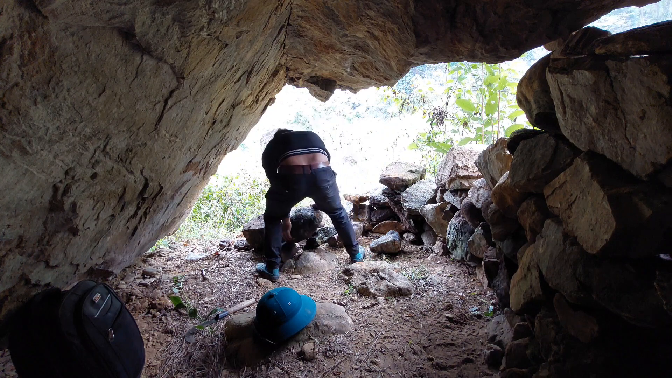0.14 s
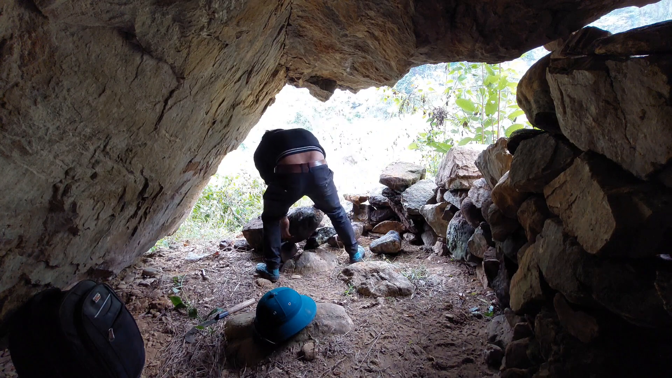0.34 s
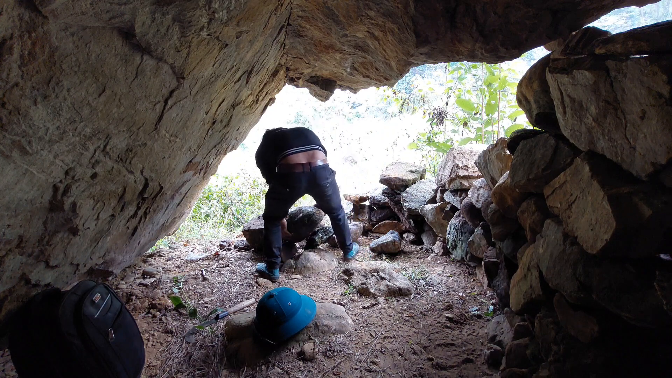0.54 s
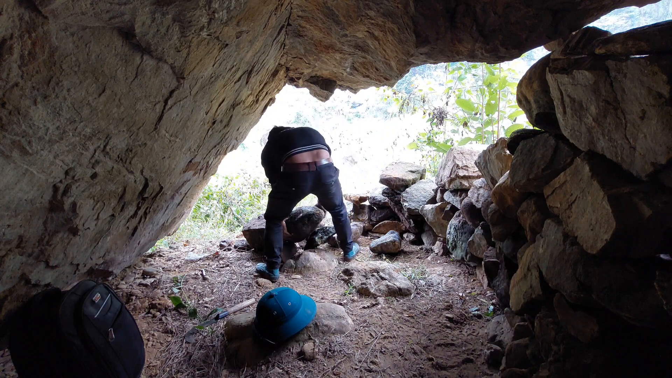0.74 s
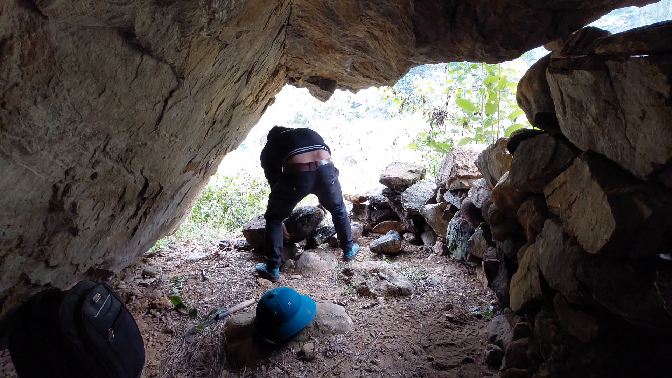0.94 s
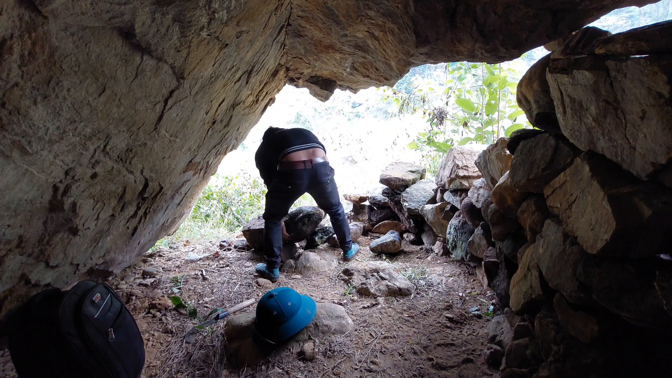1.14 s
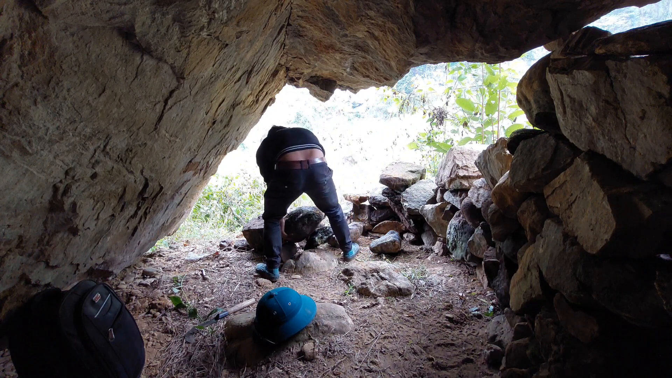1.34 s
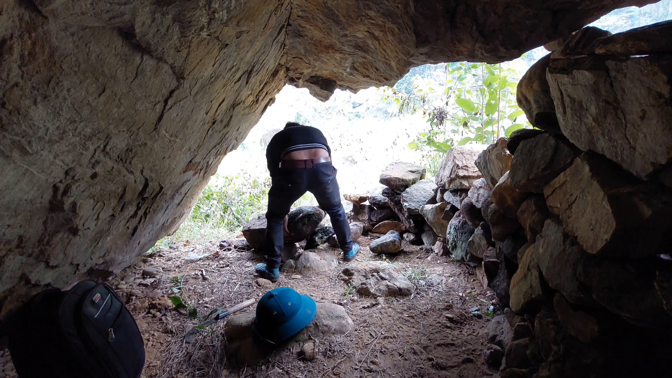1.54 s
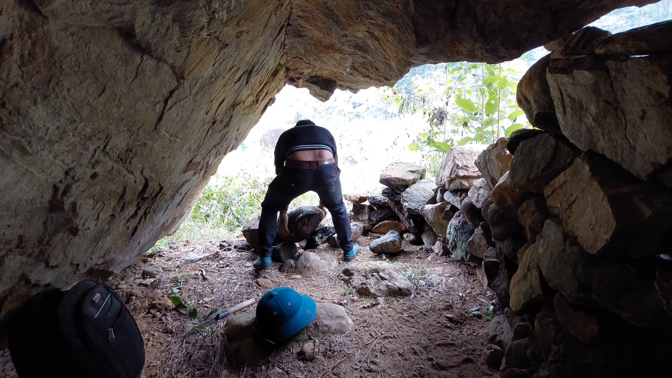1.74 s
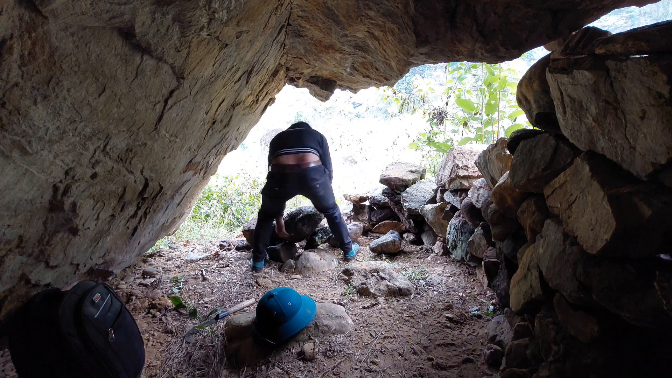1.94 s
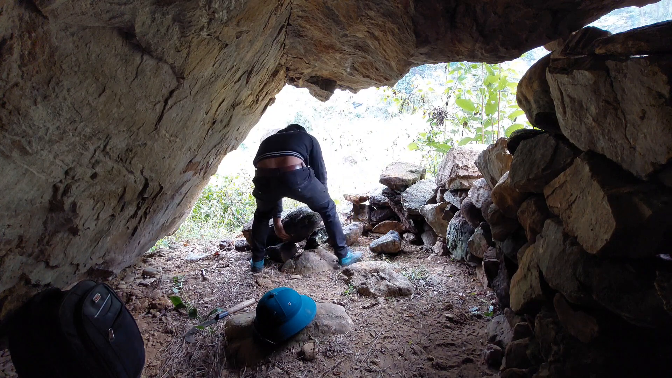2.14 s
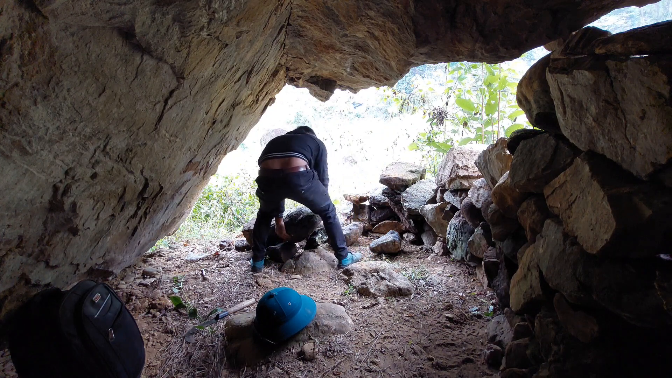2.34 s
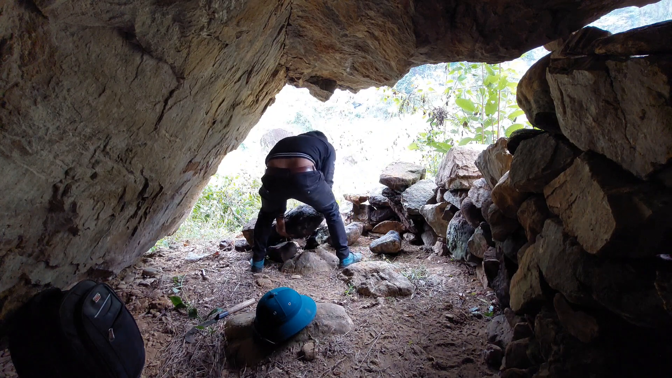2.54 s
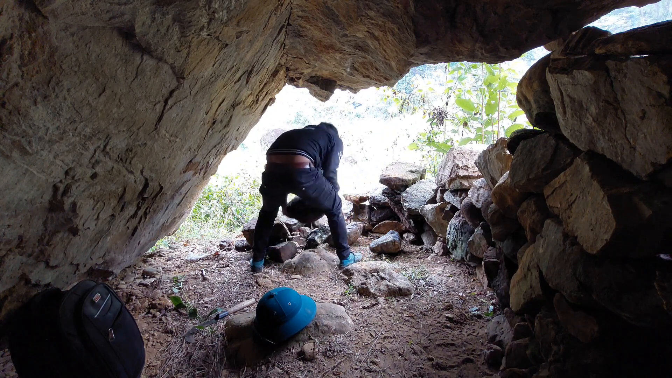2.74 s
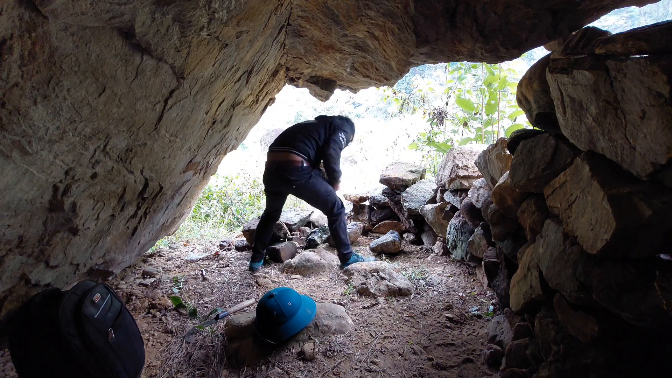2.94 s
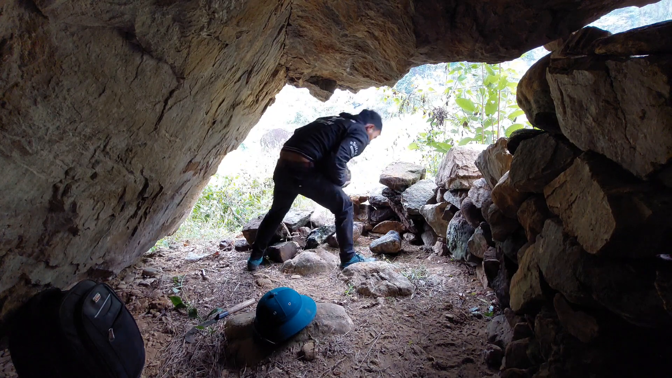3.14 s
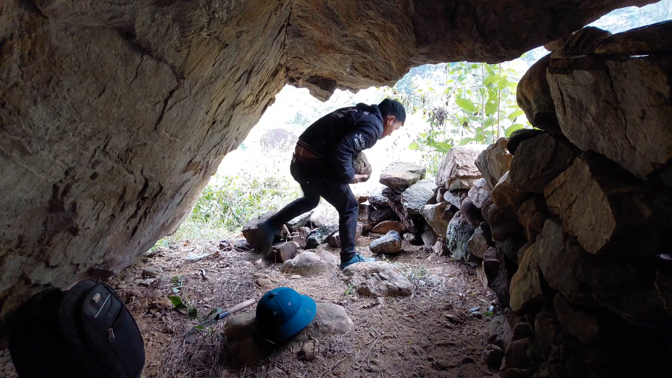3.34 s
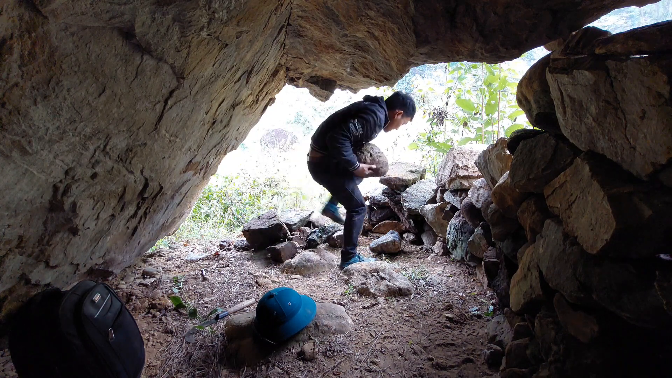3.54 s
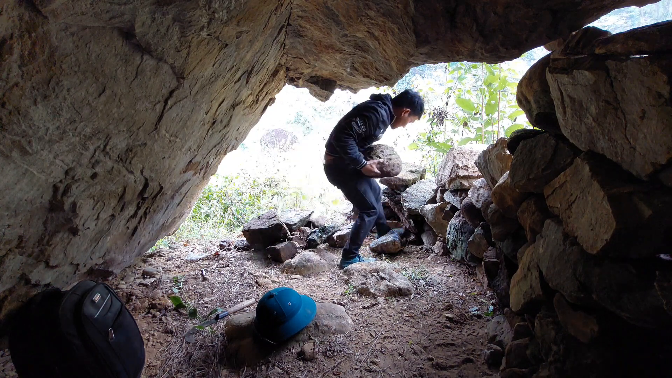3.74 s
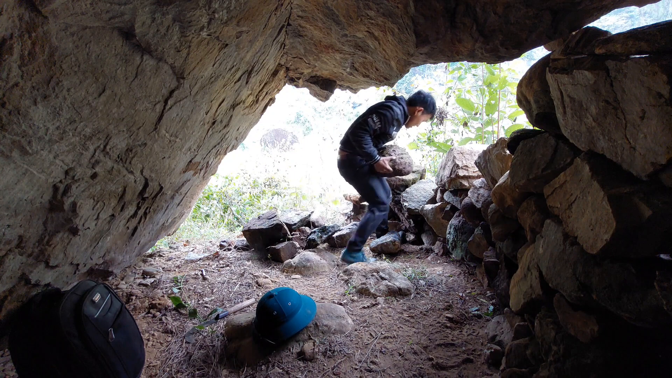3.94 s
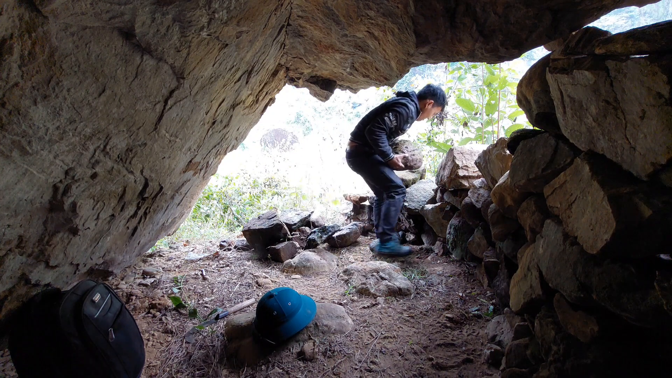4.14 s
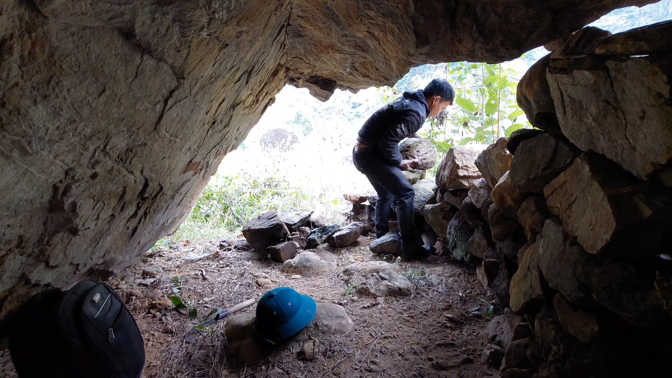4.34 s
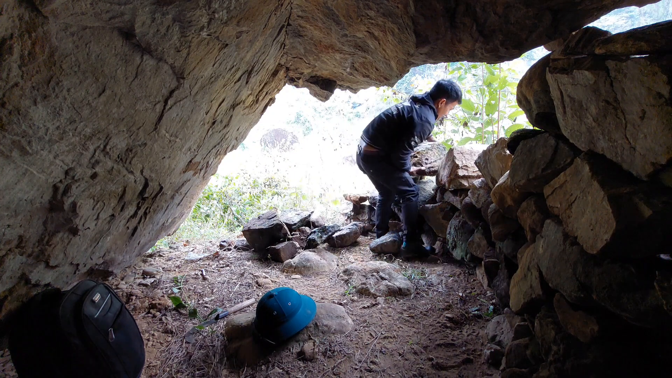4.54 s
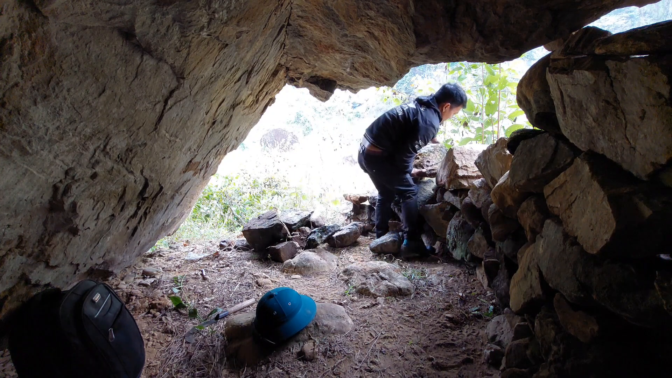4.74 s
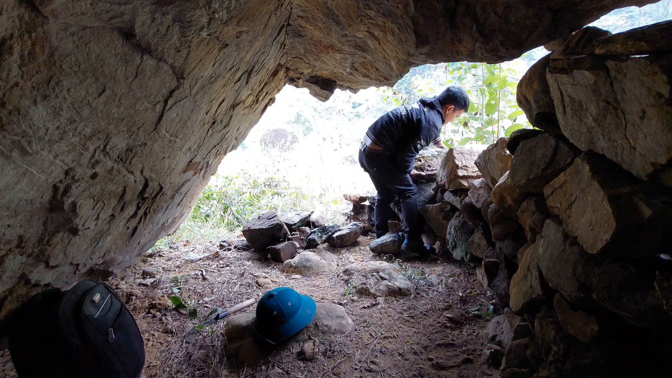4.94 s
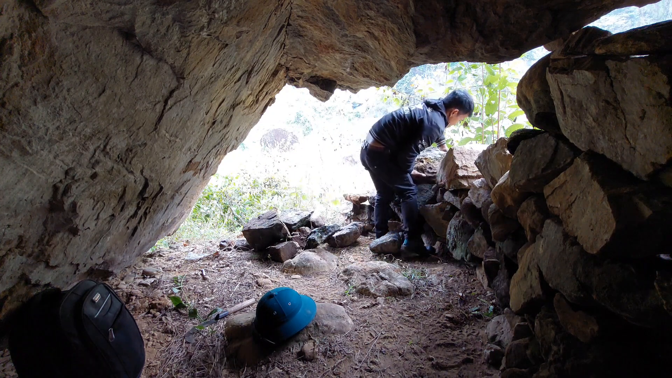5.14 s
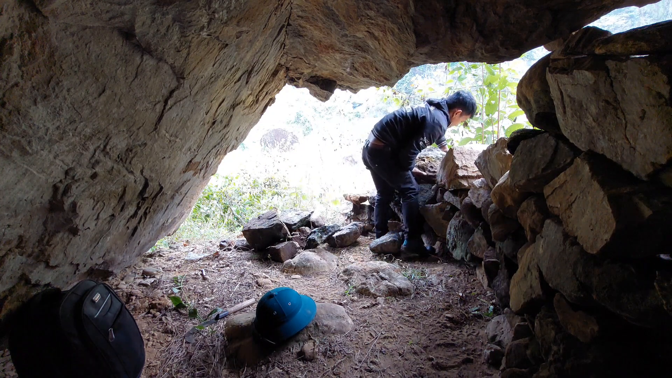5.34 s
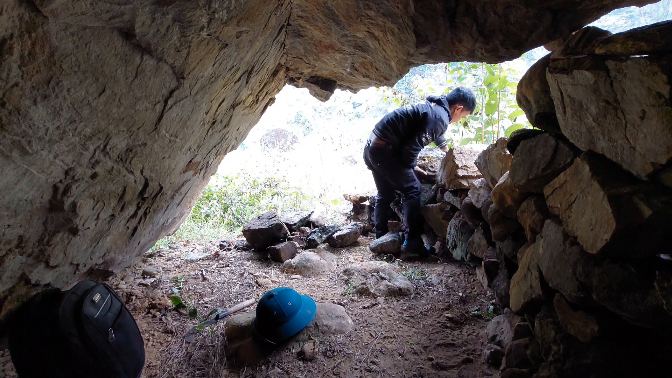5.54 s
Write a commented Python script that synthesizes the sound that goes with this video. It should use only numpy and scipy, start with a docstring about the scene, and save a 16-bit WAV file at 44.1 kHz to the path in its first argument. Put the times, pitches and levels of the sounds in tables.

```python
"""Stones on a dry wall

Heavy stones are dropped and set down on a dry wall at the mouth of a rock shelter, heard from inside.
Each blow booms in the hollow with a short, dull crunch. A jacket rustles and faintly squeaks, grit
grinds and ticks, and pebbles clink, over a distant wash and a low outdoor rumble."""
import sys
import numpy as np
from scipy import signal
from scipy.fft import rfft, irfft, next_fast_len
from scipy.io import wavfile
from scipy.ndimage import uniform_filter1d

SR = 44100
rng = np.random.default_rng(int(sys.argv[2]) if len(sys.argv) > 2 else 0)


def int16_out(signal):
    """Quantize to a 16-bit WAV file."""
    q = np.round(np.clip(np.atleast_2d(signal).T, -1, 1) * 32767)
    wavfile.write(sys.argv[1], SR, q.astype(np.int16))


N = 250488

# tone of the distant wash: f/Hz, gain/dB
WASH_EQ = [(53, -34), (90, -5.5), (124, -1.5), (243, -6), (282, -2), (343, -4.5), (382, -6.5), (474, -6.5),
           (539, -9), (699, -8), (925, -12), (1880, -20), (4560, -36), (7330, -48), (15600, -53.5)]
# stereo image of the wash: f/Hz, left-right correlation
WASH_CORRELATION = [(60, 0.85), (130, 0.99), (290, 0.8), (640, 0.32), (1200, -0.31), (2500, 0.15),
                    (15000, -0.19)]
# tone of the rumble: f/Hz, gain/dB
RUMBLE_EQ = [(8.8, -66), (15, -24), (54, 0), (76, -1), (83, -15.5), (92, -16.5), (110, -15), (140, -30),
             (240, -120)]
# slow swell of the rumble: t/s, level/dB
RUMBLE_LEVELS = [(0.7, -47), (2.49, -47.5), (2.9, -44), (3.5, -46), (4.0, -46.5), (4.3, -44.5),
                 (4.82, -45.5), (5.68, -46)]
# modes of the hollow and its floor: f/Hz, level/dB, t60/s, left over right/dB, left phase lead/rad
HOLLOW_MODES = [(42.2, 5.5, 0.26, 0, 0), (54.9, -16.5, 0.43, 0, 0), (68.4, 4, 0.22, 0, 0),
                (105.4, -8.5, 0.21, -3, 0.7), (133.1, -1, 0.15, 1, -0.2), (172, -12.5, 0.14, -7, 0),
                (230.5, 0.5, 0.098, 1, 0.8), (272, -12, 0.11, 6, 0.5), (352, 3.5, 0.042, 0, 1.2),
                (428, -2, 0.07, 4, 1.5), (483.5, -2.5, 0.068, -11.5, 3), (548.2, -0.5, 0.096, -5.5, 1.92),
                (741, -5.5, 0.053, -11.5, 2), (891, -11.5, 0.098, 1, 2), (1280, -13, 0.026, -7.5, 3)]
# blows of stone or foot: t/s, level/dB, favoured pitch/Hz, depth/dB, weight/dB, knock/dB
STONE_BLOWS = [(0, -10.5, 363, -40, -7, -10), (0.014, -15, 110, -29, -31, -11.5),
               (.054, -14, 290, -7.5, -18, -17.5), (.065, -18.5, 324, -11, -8.5, -15),
               (.099, -27.5, 145, -7, -13, -14), (.14, -33, 184, -0.5, 2.5, -14),
               (0.41, -36.5, 224, -12, -2, -24), (.446, -23.5, 150, -20, -9, -31),
               (.464, -28, 105, -3.5, -5, -17), (.565, -33.5, 243, -9, 3, -3.5),
               (.588, -37, 143, -3, -1, -12), (1.937, -30.5, 131, -9, -2, -8.5),
               (1.958, -36.5, 130, -13, -17, -6.5), (2.202, -35.5, 144, -24, -14, -3.5),
               (2.439, -39.5, 250, -11, -14, -7), (3.806, -29, 148, -14, -17, -10.5),
               (3.844, -29, 250, -17, -24, -13.5), (3.875, -36.5, 240, -8, -15, -21),
               (4.326, -29.5, 226, -28, -6, -13), (4.5862, -19, 229, -9, -6, -16.5),
               (4.599, -17, 139, -2, -2.5, -15.5), (4.619, -23.5, 225, -11, -10, -13),
               (4.633, -23.5, 131, 0, -3, -23), (5.095, -21.5, 232, -20, 6, -15),
               (5.103, -23.5, 200, -1.5, 10, -19)]
# tone of a blow's crunch: f/Hz, gain/dB
CRUNCH_EQ = [(250, -11), (500, 14.5), (1000, 3), (3000, -15), (9000, -28)]
# swishes of sleeve or shoe: peak t/s, rustle level/dB, length/s, grit over rustle/dB
SWISH_CUES = [(0, -46, 0.029, 10.5), (.045, -58.5, 0.24, 3), (0.564, -61.5, 0.1, 10.5), (.66, -72, .1, -5),
              (.78, -73, .14, 0), (1.78, -69, .12, 10), (1.94, -50.5, .06, 3.5), (2.037, -61.5, 0.12, -3),
              (2.196, -50.5, 0.098, 6), (2.803, -61.5, 0.42, 6.5), (3.014, -59, 0.093, 5),
              (3.336, -54.5, 0.14, 1.5), (3.422, -56, 0.1, 2), (3.689, -57, 0.16, 1),
              (3.814, -64, 0.069, 14), (4.001, -60, 0.07, 0), (4.162, -58.5, 0.2, 3.5),
              (4.335, -60.5, 0.078, 5), (4.523, -60.5, .05, 1), (4.615, -61.5, 0.16, 9.5),
              (5.024, -68, 0.077, 1), (5.11, -67, 0.098, 2), (5.68, -73, .07, 5)]
# bed of jacket rustle under the swishes: t/s, level/dB
RUSTLE_LEVELS = [(0, -67), (.3, -83), (.6, -67.5), (1.03, -87), (1.72, -81), (2.36, -73), (2.67, -78),
                 (2.9, -64), (3.22, -69), (3.58, -64), (3.93, -68.5), (4.08, -73), (4.45, -68.5),
                 (4.7, -80), (4.9, -84), (5.25, -85), (5.68, -76)]
# tone of rubbing cloth: f/Hz, gain/dB
CLOTH_EQ = [(2940, -27), (5000, 5.5), (5730, 4.5), (7060, 2), (8770, -4), (9240, -2), (11500, 2),
            (14600, 1), (15400, -1)]
# tone of grinding grit: f/Hz, gain/dB
GRIT_EQ = [(500, -6), (1000, 9.5), (2500, 5.5), (5000, -2.5), (7000, -12.5), (10000, -42)]
# ticks of grit: t/s, level/dB, centre f/Hz, relative width, t60/s, left over right/dB
GRIT_TICKS = [(.564, -51, 2500, 0.43, .04, 3), (0.591, -42, 13000, 0.82, 0.063, 2),
              (2.1867, -47, 4500, 0.41, 0.051, 5), (3.3964, -52, 9000, .5, .03, 6),
              (3.804, -48, 10000, 0.61, 0.091, 3), (4.3226, -59, 6000, .5, .05, 3),
              (4.4997, -60, 12500, .25, 0.074, 1), (4.549, -48.5, 11600, 0.51, 0.077, 2),
              (4.586, -45.5, 3000, .45, 0.04, 5), (4.991, -48, 11500, .22, 0.081, 2),
              (5.094, -61, 6000, .5, 0.09, 5)]
# clinks of small pebbles: t/s, level/dB, f/Hz, t60/s
PEBBLE_CLINKS = [(2.182, -48, 5000, .05), (2.186, -50, 2800, .05), (2.225, -52, 3900, .04),
                 (3.175, -52, 3200, .07), (3.425, -60, 7000, .04), (3.81, -44, 1940, .08),
                 (3.813, -54, 4250, .04), (3.85, -53, 1950, .05), (4.325, -45, 1150, .05),
                 (4.586, -56, 4500, .03)]
# squeaks of the jacket: t/s, length/s, start f/Hz, end f/Hz, level/dB
JACKET_SQUEAKS = [(3.972, .045, 11400, 12000, -76), (4.22, .03, 10600, 11500, -79),
                  (4.31, .045, 11600, 12300, -75)]


def gain_of(db):
    return 10 ** (np.asarray(db) / 20)


def unit_rms(x):
    return x / np.sqrt(np.mean(x ** 2) + 1e-20)


def curve_at(points, hz):
    f, value = np.transpose(points)
    return np.interp(np.log(hz + 1), np.log(f + 1), value)


def add(mix, start_s, sound):
    part = mix[:, max(round(start_s * SR), 0):][:, :sound.shape[1]]
    part += sound[:, :part.shape[1]]


def panned(x, db):
    return x * gain_of([[db / 2], [-db / 2]])


def bell(hz, width):
    """An EQ curve that peaks at hz and is 5 dB down one relative width to either side."""
    return [(hz * np.exp(width * k), -5 * k ** 2) for k in range(-3, 4)]


def coloured(x, eq):
    size = next_fast_len(x.shape[-1])
    gain = gain_of(curve_at(eq, np.fft.rfftfreq(size, 1 / SR)))
    return irfft(rfft(x, size) * gain, size)[..., :x.shape[-1]]


def grains(eq, per_s, spread_db):
    """Dense tiny clicks of uneven size, different ones left and right."""
    size = gain_of(spread_db * np.minimum(rng.exponential(1, (2, N)), 5))
    polarity = rng.choice([-1., 1.], (2, N))
    fires = rng.random((2, N)) < per_s / SR
    return unit_rms(coloured(size * polarity * fires, eq))


def distant_wash(level_db=-46, patchy_db=1.0):
    """Far-off water or leaves: soft, faintly patchy noise, centred in the bass and wide above."""
    frames, hz = N // 256 + 5, np.fft.rfftfreq(1024, 1 / SR)
    left_re, left_im, side_re, side_im, patches = rng.standard_normal((frames, 513, 5)).T
    patches = uniform_filter1d(patches, size=12, axis=0)  # smeared in pitch
    patches = unit_rms(uniform_filter1d(patches, size=10, axis=1))  # and in time
    alike = curve_at(WASH_CORRELATION, hz)[:, None]
    left = left_re + 1j * left_im
    right = alike * left + np.sqrt(1 - alike ** 2) * (side_re + 1j * side_im)
    spectra = np.array([left, right]) * gain_of(curve_at(WASH_EQ, hz)[:, None] + patchy_db * patches)
    return gain_of(level_db) * unit_rms(signal.istft(spectra, nperseg=1024, noverlap=768)[1][:, :N])


def hollow_rumble(width=0.065):
    """The hollow hums with low outdoor noise, almost in mono."""
    mid, side = coloured(rng.standard_normal((2, N)), RUMBLE_EQ)
    level = gain_of(np.interp(np.arange(N) / SR, *np.transpose(RUMBLE_LEVELS)))
    return level * unit_rms(np.array([mid + width * side, mid - width * side]))


def stone_blows(crunch_db=-8, crunch_t60=0.11, crunch_pan_db=-3, db_per_octave=9, rise_cycles=0.7):
    """Each blow rings the hollow, low modes blooming later; the rocks scatter a short, dull crunch."""
    out, t = np.zeros((2, N)), np.arange(SR // 2) / SR
    noises = rng.standard_normal((len(STONE_BLOWS), 2, len(t)))
    hz, mode_db, t60, lean_db, lead = np.transpose(HOLLOW_MODES)[:, :, None]
    side = np.array([.5, -.5])[:, None, None]
    polarity = (-1.) ** np.arange(len(hz))[:, None]
    bloom = 1 - np.exp(-t * hz / rise_cycles)
    decay = gain_of(mode_db + side * lean_db - 60 * t / t60)
    rings = polarity * bloom * decay * np.sin(2 * np.pi * hz * t + side * lead)
    crunch_attack = np.minimum(t / 0.0017, 1)
    for (start, db, pitch_hz, depth_db, weight_db, knock_db), noise in zip(STONE_BLOWS, noises):
        # depth and weight drive the lows, knock the top; the mids gather round the stone's pitch
        mids_db = -db_per_octave * abs(np.log2(hz / pitch_hz))
        drive_db = np.select([hz < 52, hz < 90, hz > 400], [depth_db, weight_db, knock_db], mids_db)
        boom = (gain_of(drive_db) * rings).sum(axis=1)
        crunch_decay = gain_of(knock_db + crunch_db - 60 * t / crunch_t60)
        crunch = crunch_attack * crunch_decay * unit_rms(coloured(noise, CRUNCH_EQ))
        add(out, start, gain_of(db) * (boom + panned(crunch, crunch_pan_db)))
    return out


def rustle_and_grind(grit_bed_db=-64, rise_share=0.37, edge_db=-13.5):
    """Cloth rubs on cloth while shoes and stones grind the grit; each swish swells fast, fades slower."""
    t = np.arange(N) / SR
    cloth_power = gain_of(np.interp(t, *np.transpose(RUSTLE_LEVELS))) ** 2
    grit_power = gain_of(grit_bed_db) ** 2
    for peak_s, db, length, grit_db in SWISH_CUES:
        ramp_s = length * np.where(t < peak_s, rise_share, 1 - rise_share)
        from_peak = abs(t - peak_s) / ramp_s  # 1 at either edge of the swish
        swish_power = gain_of(db + edge_db * np.minimum(from_peak, 8) ** 0.85) ** 2
        cloth_power += swish_power
        grit_power += swish_power * gain_of(grit_db) ** 2
    rustle = np.sqrt(cloth_power) * grains(CLOTH_EQ, per_s=12000, spread_db=2.4)
    grind = np.sqrt(grit_power) * grains(GRIT_EQ, per_s=2500, spread_db=1.7)
    return rustle + grind


def grit_ticks(crack_t60=0.0025, tail_db=-5):
    """Grit snaps with a sharp, bright crack whose tail dies among the rocks."""
    out, t = np.zeros((2, N)), np.arange(SR // 8) / SR
    for start, db, hz, width, t60, pan_db in GRIT_TICKS:
        band = unit_rms(coloured(rng.standard_normal((2, len(t))), bell(hz, width)))
        decay = gain_of(-60 * t / crack_t60) + gain_of(tail_db - 60 * t / t60)
        add(out, start, panned(gain_of(db) * decay * band, pan_db))
    return out


def pebble_clinks(width=0.017, attack_s=0.00055):
    """Small pebbles clink, each a quickly dying ring of narrow-band noise."""
    out, t = np.zeros((2, N)), np.arange(SR // 8) / SR
    for start, db, hz, t60 in PEBBLE_CLINKS:
        ring = unit_rms(coloured(rng.standard_normal((2, len(t))), bell(hz, width)))
        envelope = gain_of(db - 60 * t / t60) * np.minimum(t / attack_s, 1)
        add(out, start, envelope * ring)
    return out


def jacket_squeaks(roughness_hz=250):
    """The jacket squeaks faintly: a thin, high tone, roughened by noise, that slides upward."""
    out = np.zeros((2, N))
    for start, length, from_hz, to_hz, db in JACKET_SQUEAKS:
        t = np.arange(0, length, 1 / SR)
        noise = rng.standard_normal((2, SR // 8))
        roughness = unit_rms(uniform_filter1d(noise, int(SR / roughness_hz)))[:, :len(t)]
        glide = np.sin(2 * np.pi * (from_hz + .5 * (to_hz - from_hz) * t / length) * t)
        add(out, start, gain_of(db) * (.5 + roughness) * glide * signal.windows.tukey(len(t), .5))
    return out


def scene():
    """The outdoor bed, with the stone work and its small noises on top."""
    bed = distant_wash() + hollow_rumble()
    return bed + stone_blows() + rustle_and_grind() + grit_ticks() + pebble_clinks() + jacket_squeaks()


def record(dry):
    """A steep low-pass takes off the air above 15.6 kHz."""
    low_pass = signal.firwin(1023, 15600, window=("kaiser", 9), fs=SR)
    return signal.oaconvolve(dry, low_pass[None], "same")


dry = scene()
out = record(dry)
int16_out(out)
```